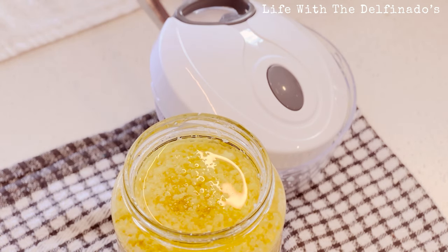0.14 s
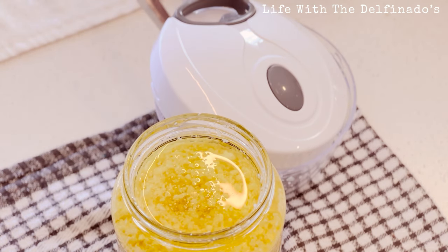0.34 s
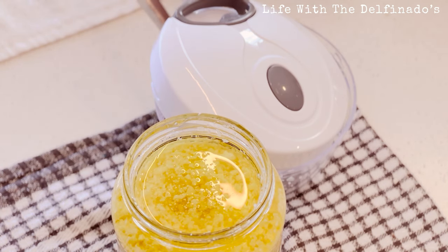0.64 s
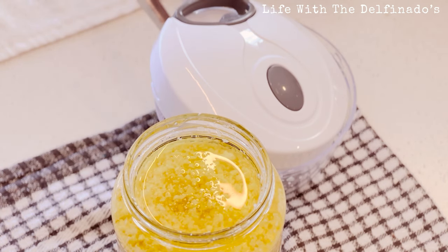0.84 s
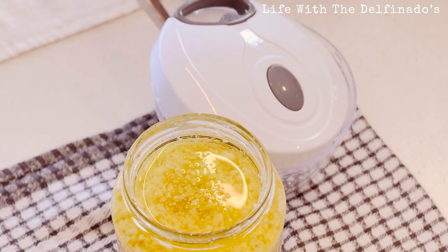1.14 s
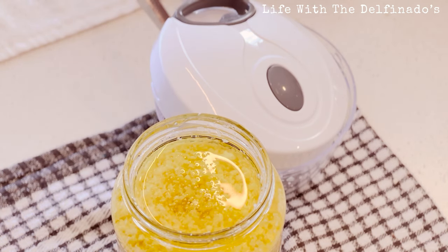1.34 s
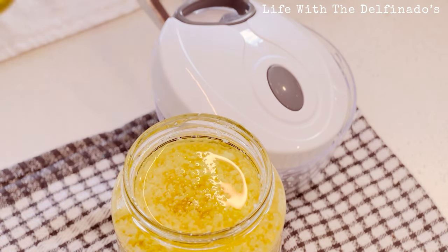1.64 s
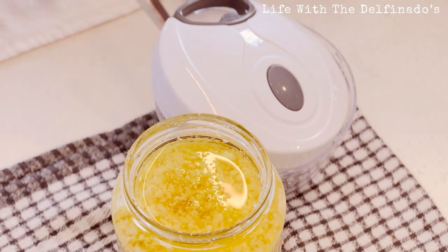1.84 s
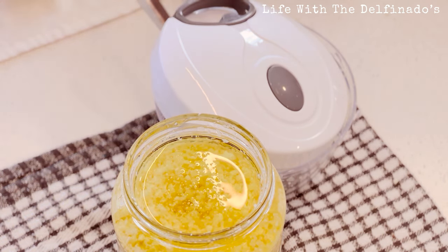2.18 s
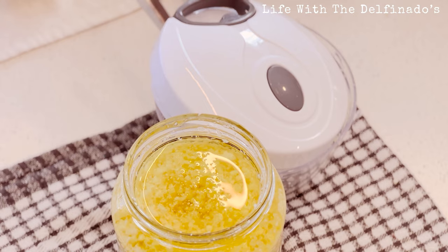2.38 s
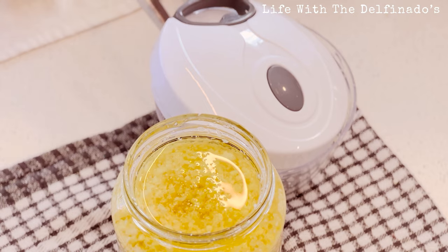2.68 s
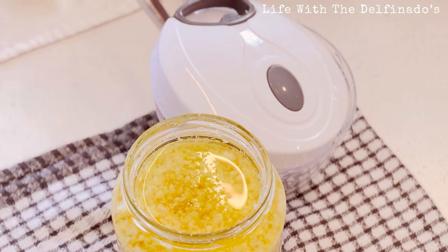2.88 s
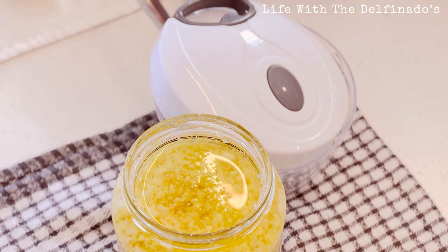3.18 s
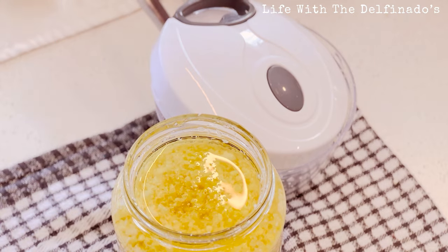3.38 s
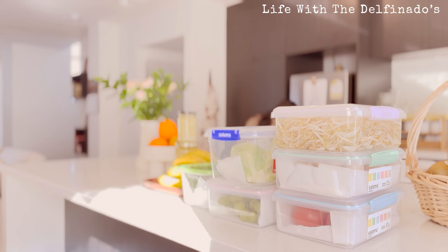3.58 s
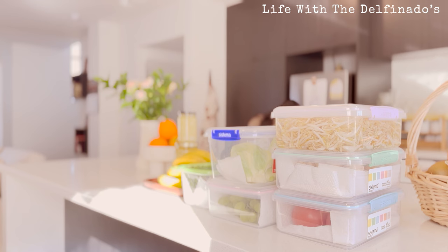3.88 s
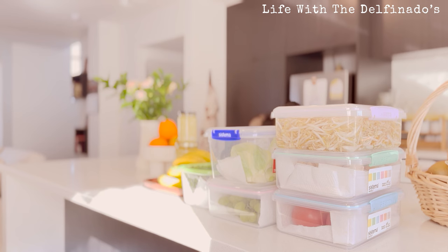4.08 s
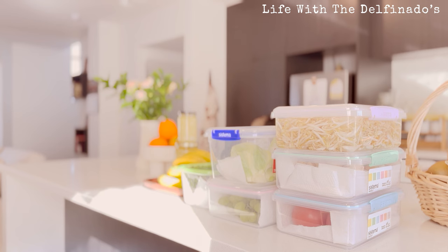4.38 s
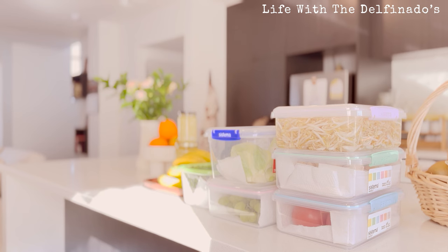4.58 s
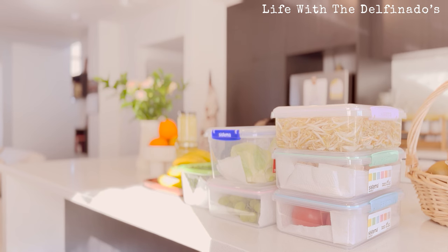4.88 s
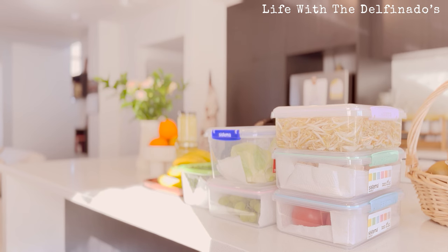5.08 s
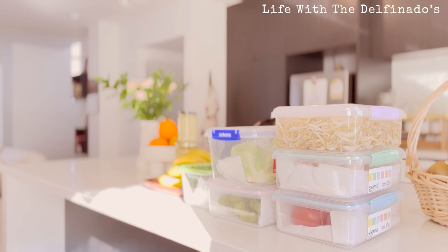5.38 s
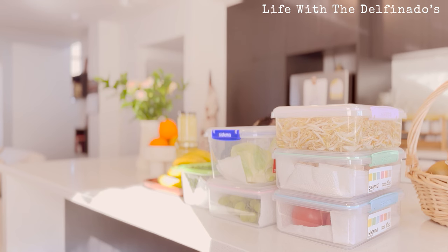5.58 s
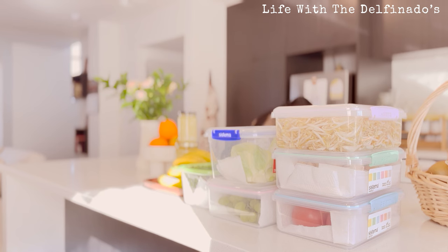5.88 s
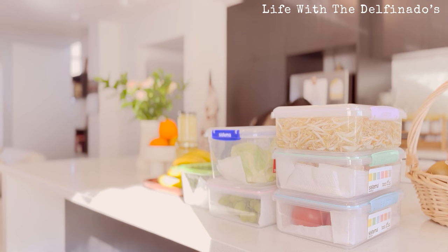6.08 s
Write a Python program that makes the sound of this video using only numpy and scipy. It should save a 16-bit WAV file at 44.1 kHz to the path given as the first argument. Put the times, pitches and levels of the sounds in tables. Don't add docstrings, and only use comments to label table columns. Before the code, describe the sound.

Soft cloth scuffs and tiny glass ticks close up over a low fridge hum, then paper crinkles and a plastic drawer bangs shut.

```python
import sys
import numpy as np
from scipy import signal
from scipy.fft import rfft, irfft
from scipy.io import wavfile
from scipy.ndimage import uniform_filter1d

SR = 44100
rng = np.random.default_rng(int(sys.argv[2]) if len(sys.argv) > 2 else 0)


def volts_from_db(level):
    exponent = np.asarray(level, float) / 20
    return 10 ** exponent


def transcribe(signal):
    frames = np.atleast_2d(signal).T
    limited = np.clip(frames, -1, 1)
    pcm = np.round(limited * 32767).astype(np.int16)
    wavfile.write(sys.argv[1], SR, pcm)


N = 274743
T = np.arange(N) / SR
HZ = np.fft.rfftfreq(N, 1 / SR)


def read(points, hz):
    f, value = np.transpose(points)
    return np.interp(np.log(hz + 1), np.log(f + 1), value)


def evened(x):
    return x / np.sqrt(np.mean(x ** 2) + 1e-20)


def bumps(peaks):
    return sum(db / (1 + (2 * (HZ - hz) / width) ** 2) for hz, width, db in peaks)


def add(mix, s, t60, rise, gain, hz=0, lead=0):
    t = T[:round(2 * t60 * SR)]
    part = mix[..., round(s * SR):][..., :len(t)]
    envelope = (1 - np.exp(-t / rise)) * volts_from_db(-60 * t / t60)
    shape = envelope * np.cos(2 * np.pi * hz * t + lead)
    part += gain * shape[..., :part.shape[-1]]


# f/Hz, likeness/0-1, left lead/rad, left-right level/dB
PORTS_1 = [(60, .99, 0, -1), (250, .8, 0, -.5), (700, .5, .2, 0), (1700, .4, .4, -4), (2700, .9, .6, 0),
           (7100, .85, 1.2, 0), (7450, .97, 3.1, 0), (7900, .85, 5.2, 0), (11100, .98, 3.1, 0),
           (14200, .99, 0, 0), (16000, .95, -.8, 0)]
PORTS_2 = [(60, .98, -.1, -2), (160, .93, -.3, -1), (330, .88, -.45, -1), (550, .2, -1, -1),
           (2000, .2, -.7, -1.5), (4500, .15, -.3, 1), (6900, .2, .8, 7), (8500, .6, -.3, 1),
           (11200, .98, -3.14, 0), (14000, .99, -6.1, 0), (15200, .99, -6.5, 0), (16000, .95, -7.3, 0)]


def pair(ports, grains=1.0):
    left, other = rfft(grains * rng.standard_normal((2, N)))
    hz, *columns = np.transpose(ports)
    same, lead, pan_db = (read(np.transpose([hz, column]), HZ) for column in columns)
    same = np.clip(same, 0, 1)
    right = (same * left + np.sqrt(1 - same ** 2) * other) * np.exp(-1j * lead)
    return np.array([left * volts_from_db(pan_db / 2), right / volts_from_db(pan_db / 2)])


# t/s, share/0-1
MOVE = [
    (3.0, 0.02),
    (3.4, 0.99),
]


def second_spot_share():
    return np.clip(np.interp(T, *np.transpose(MOVE)), 0, 1)


# f/Hz, level per Hz/dB
AIR_1 = [(20, -29.5), (55, -3.5), (100, -12), (259, -18), (428, -21.5), (800, -30), (1300, -42),
         (1930, -42), (3440, -53.5), (6000, -50), (8230, -49), (10000, -48), (12000, -48), (12600, -71.5)]
AIR_2 = [(20, -44), (55, -7), (100, -23), (130, -25.5), (240, -23), (330, -30), (500, -39.5), (1000, -51.5),
         (2000, -54.5), (4500, -61.5), (7400, -56.5), (9300, -68), (11800, -61), (12600, -90.5)]
# f/Hz, width/Hz, level/dB
AIR_BUMPS = [(7450, 150, -1.5), (5640, 120, -1), (8200, 150, 3.5)]


def still_air(share):
    first = pair(PORTS_1) * volts_from_db(read(AIR_1, HZ) + bumps(AIR_BUMPS))
    second = pair(PORTS_2) * volts_from_db(read(AIR_2, HZ))
    first, second = (evened(irfft(z, N)) for z in (first, second))
    first_part = volts_from_db(-48) * np.sqrt(1 - share) * first
    return first_part + volts_from_db(-43.5) * np.sqrt(share) * second


# t/s, level/dB
HUM = [(0, -42.5), (.19, -59.5), (.4, -38.5), (.59, -49), (1.0, -43.5), (1.22, -50.5), (1.39, -38),
       (1.53, -62), (1.68, -41), (2.19, -52.5), (2.34, -37), (2.51, -54.5), (2.67, -41.5), (2.85, -46.5),
       (3.68, -35.5), (5.38, -33.5), (6.23, -36.5)]
# multiple of its speed, level/dB
HUM_ORDERS = [(2, -19), (3, -19), (3.8, -28), (4.65, -30.5), (1.2, -16.5)]


def fridge(share):
    motor_hz, extra_blur_hz, blur_hz = 78.84, 1.396, 0.598
    wander = evened(irfft(rfft(rng.standard_normal(N)) * (HZ < 9), N))
    speed_hz = motor_hz + wander * (extra_blur_hz * (1 - share) + blur_hz)
    turn = 2 * np.pi * np.cumsum(speed_hz) / SR
    orders = sum(volts_from_db(db) * np.sin(k * turn + 6 * rng.random()) for k, db in HUM_ORDERS)
    level = volts_from_db(np.interp(T, *np.transpose(HUM)))
    lag = 0.13 * share * np.array([[1], [0]])
    pan = volts_from_db((0.6 + 1.0 * share) * np.array([[-1], [1]]))
    line = level * np.sin(turn - lag) * pan
    return np.sqrt(2) * (line + volts_from_db(-43.5 + 9.6 * share) * orders)


THUD_S = [2.028, 2.062]
# level/dB, t60/s
THUD = [
    (-23, 0.21),
    (-36, 1),
]
# f/Hz, level per Hz/dB
THUD_TONE = [(25, -19), (55, 5), (100, -1.5), (170, -10), (240, -31), (500, -32), (900, -79)]


def thud():
    level = np.zeros(N)
    for s, (db, t60) in zip(THUD_S, THUD):
        add(level, s, t60, .006, volts_from_db(db))
    return level * evened(irfft(pair(PORTS_1) * volts_from_db(read(THUD_TONE, HZ)), N))


def patchy(x, patch_db):
    def blotches(bins, frames):
        noise = rng.standard_normal(z.shape[1:])
        return evened(uniform_filter1d(uniform_filter1d(noise, size=bins, axis=0), size=frames, axis=1))

    z = signal.stft(x, nperseg=512)[2]
    patches = blotches(4, 12)
    crackle = blotches(14, 3)
    z = z * volts_from_db(patch_db * (patches + 0.57 * crackle))
    return evened(signal.istft(z, nperseg=512)[1][:, :N])


# lowest f/Hz, highest f/Hz
PARTS = [
    (90, 900),
    (900, 3800),
    (3800, 11800),
    (11800, 15900),
]
STEEP = np.array([[.8], [1], [1.3], [1.9]])


def part_slopes():
    slopes = []
    for lo, hi in PARTS:
        low_edge = 1 + (lo / (HZ + 1)) ** (3 + lo / 2500)
        high_edge = 1 + (HZ / hi) ** (3 + hi / 2500)
        slopes.append(1 / low_edge / high_edge)
    return np.array(slopes)[:, None]


def rubbed(strokes, law, extras, colour, blows, blow, tone, body, ports, slips_per_s, spread_db, patch_db):
    sizes = volts_from_db(spread_db * np.minimum(rng.exponential(1, N), 4))
    slips = sizes * (rng.random(N) < slips_per_s / SR)
    grains = 1.0 + evened(signal.lfilter([1], [1, -.985], slips))
    z = rfft(patchy(irfft(pair(ports, grains), N), patch_db))
    z = z * volts_from_db(read(tone, HZ) + bumps(body))

    rows = []
    for *timing_and_db, bright_db in strokes:
        boom_db = law[0] + law[1] * bright_db
        air_db = law[2] + law[3] * bright_db
        rows.append((*timing_and_db, boom_db, bright_db, air_db))
    rows += [(*row, *colour) for row in extras]

    level = np.zeros((4, N))
    for s, swell, fade, db, boom_db, crinkle_db, air_db in rows:
        span = slice(max(round((s - 3 * swell) * SR), 0), round((s + 3 * fade) * SR))
        away = np.maximum((s - T[span]) / swell, (T[span] - s) / fade)
        parts_db = np.array([[boom_db], [0], [crinkle_db], [air_db]])
        level[:, span] += volts_from_db(db - 4.5 + parts_db - 20 * STEEP * away ** 1.455)

    air_db, air_per_db, t60 = blow
    for s, db, boom_db, bright_db in blows:
        parts_db = np.array([[boom_db], [0], [bright_db], [air_db + air_per_db * bright_db]])
        add(level, s, t60, .0015, volts_from_db(db - 9.5 + parts_db))
    return sum(g * evened(part) for g, part in zip(level, irfft(z * part_slopes(), N)))


def ringing(times, touches_db, mode_sets, rise, ports):
    out = np.zeros((2, N))
    leads = np.array(ports)[:, ::2]
    for s, touch_db, modes in zip(times, touches_db, mode_sets):
        for hz, db, t60 in modes:
            lead = np.array([[read(leads, hz)], [0]])
            add(out, s, t60, rise + 0.25 / hz, volts_from_db(touch_db + db), hz, lead)
    return out


# peak t/s, swell/s, fade/s, scrape level/dB, brightness/dB (times to 20 dB under the peak)
CLOTH = [(0, .01, 0.0051, -47.5, -1.5), (.185, .03, 0.055, -63, 0), (.214, 0.029, 0.078, -54, -12),
         (.292, 0.068, 0.17, -41.5, -6.5), (.476, 0.14, 0.086, -45, -16), (.9, 0.065, 0.1, -54, -4.5),
         (.96, 0.056, 0.11, -54.5, 1.5), (1.13, 0.024, 0.21, -72.5, 8), (1.285, 0.067, 0.094, -54, 1.5),
         (1.35, 0.047, 0.11, -61.5, -12), (1.74, 0.18, 0.13, -55, -10), (1.84, 0.077, 0.095, -59, -19),
         (2.4, 0.016, 0.026, -58, -25), (2.43, 0.04, 0.081, -64, -27), (2.6, 0.027, 0.085, -68, -17),
         (2.7, .04, .05, -67, -16), (2.56, 0.044, 0.09, -70, 1), (2.77, 0.051, 0.38, -62, -15)]
CLOTH_LAW = (-44, -1, -23, 0.5)
# peak t/s, swell/s, fade/s, scrape level/dB
FLICKS = [(.08, .04, .04, -82), (.138, .06, .06, -78), (.385, .04, .05, -84), (.88, .06, .06, -82),
          (1.05, .03, .03, -84), (1.2, .03, .03, -83), (.46, .06, .06, -80), (.608, .04, .04, -71),
          (.29, .05, .06, -80), (.79, .04, .04, -84), (.95, .12, .09, -80), (1.25, .04, .05, -84),
          (1.39, .03, .03, -82), (1.136, .09, .07, -71), (1.438, .06, .05, -75)]
# boom/dB, crinkle/dB, air/dB
FLICK = (-30, 8, 21)
# t/s, scrape level/dB, boom over scrape/dB, brightness/dB
TICKS = [(.2458, -49, -18, -25), (0.51, -40, -6, -36), (.8934, -41, -16, -24), (1.2605, -63, -17, -14),
         (1.428, -60.5, -16, 9), (1.6213, -52, 11, -18), (2.142, -68, 3, -22), (2.751, -44.5, -2, -1.5),
         (2.8444, -61, -7, -18)]
# air level/dB, air per dB of brightness, t60/s
TICK = (-7, 3.3, 0.066)
# f/Hz, level per Hz/dB
CLOTH_TONE = [(300, -25), (634, 3), (1230, -11), (1700, 1.5), (2500, 0), (3300, -10.5), (4000, -12),
              (6000, -11), (7440, -21.5), (10000, -27.5), (12000, -41), (14000, -36), (16000, -38)]
# f/Hz, width/Hz, level/dB
CLOTH_BODY = [(2160, 500, 1.3), (2700, 88, 1.6), (5500, 500, 1.6), (6260, 200, 3.7), (6830, 280, 4.9),
              (7860, 200, 7.2), (9150, 75, 2.8), (9800, 270, 4)]


def cloth():
    return rubbed(CLOTH, CLOTH_LAW, FLICKS, FLICK, TICKS, TICK, CLOTH_TONE, CLOTH_BODY, PORTS_1,
                  slips_per_s=900, spread_db=0.72, patch_db=2.4)


CLINK_S = [1.4297, 1.618, 2.5537, .513, .894, 2.388, 2.7497, .6846, 2.562, 2.396, 2.42, 2.445, 2.144]
CLINKS = [-47.5, -52, -56, -40, -49, -49.5, -44, -49.5, -61, -60, -58, -60, -65]
# f/Hz, level/dB, t60/s
GLASS = [
    [(2920, -5.5, .03), (4100, -2, .02), (6900, -3, .03), (7770, -3, .09), (9800, 0, .04),
     (13700, 12, 0.018), (15000, 2, .03)],
    [(2180, 6.5, 0.047), (4390, -10, 0.055), (5640, -9, .03)],
    [(2190, -2, 0.2), (2630, -6, 0.1), (3070, -7, 0.15), (3600, -8, .17), (4320, -9.5, 0.15),
     (5030, -12, .15), (6050, -4, .1), (6240, 10.5, 0.071), (6830, -5, .06)],
    [(2030, 3, 0.022), (2630, -23, .02)],
    [(2150, 1, 0.19), (2730, 3, 0.13), (9000, -7, .08)],
    [(1400, -0.5, 0.044), (1690, 7.5, 0.023), (2040, 1, 0.044), (2800, -19, 0.018)],
    [(595, 6.5, 0.018), (1260, 2, 0.01), (2110, 2.5, 0.012), (4500, -0.5, 0.013), (5750, -5, 0.0098),
     (9000, 5, 0.0073)],
    [(5840, 0, 0.0071), (6960, 0, 0.0098), (9200, 0, 0.0072)],
    [(2210, 2, .4), (1950, -3, .2), (2600, -4, 0.3), (6810, -4, .06), (6050, -8, .15)],
    [(1610, 1, .12), (2230, -3, .12), (1900, -1, .1), (3000, -8, .02)],
    [(1740, 2, 0.083), (2300, -5, .06)],
    [(1660, -2, .08), (1500, -1, 0.13)],
    [(1300, 1, .02), (700, 1, .02)],
]


def glass_jar():
    return ringing(CLINK_S, CLINKS, GLASS, 0.00027, PORTS_1)


# peak t/s, swell/s, fade/s, scrape level/dB, brightness/dB
PAPER = [(3.09, 0.17, 0.087, -53.5, -4.5), (3.142, 0.05, 0.15, -48, 8), (3.26, 0.045, 0.083, -42, -1.5),
         (3.384, 0.19, 0.4, -38, 5), (3.61, 0.31, 0.25, -35, -2), (4.0, 0.022, 0.085, -50.5, -1.5),
         (5.465, 0.025, 0.055, -70, 10), (5.766, 0.12, 0.5, -75, -16), (6.0, 0.055, 0.1, -60, -12),
         (6.09, 0.032, 0.13, -51, -12.5)]
PAPER_LAW = (-7, 0.82, -5.5, 1.5)
# peak t/s, swell/s, fade/s, scrape level/dB
SHOVES = [(3.1, 0.035, 0.11, -59), (3.613, 0.0051, 0.066, -46), (3.68, .03, 0.1, -54.5),
          (3.72, 0.031, 0.18, -60), (3.85, 0.07, 0.11, -64.5), (3.47, 0.13, 0.065, -63),
          (5.77, 0.066, 0.72, -73)]
# boom/dB, crinkle/dB, air/dB
SHOVE = (21, -15, -40)
# t/s, scrape level/dB, boom over scrape/dB, brightness/dB
SNAPS = [(3.042, -60, -5, -3), (3.068, -73, 0, -8), (3.13, -53, -9, 8), (3.1395, -49, -6, 9),
         (3.239, -36.5, 1, -2), (3.3704, -36.5, -21, 13), (3.4524, -23.5, -13, -3.5),
         (3.5557, -39, -36, 13), (3.763, -28, -32, -7.5), (5.975, -52, 2, -8), (6.068, -41, 5, -11),
         (3.93, -61.5, -13, 0)]
# air level/dB, air per dB of brightness, t60/s
SNAP = (-11.5, 1.4, 0.13)
# f/Hz, level per Hz/dB
PAPER_TONE = [(60, -36), (100, -0.5), (244, -7.5), (500, -3.5), (1000, -4), (1720, -8.5), (3000, -10.5),
              (5000, -15), (7000, -15.5), (9500, -17.5), (12000, -19), (14500, -17), (16000, -15.5)]
# f/Hz, width/Hz, level/dB
PAPER_BODY = [(408, 63, 6.3), (2250, 140, 3.9), (7800, 2900, 3.4)]


def paper():
    return rubbed(PAPER, PAPER_LAW, SHOVES, SHOVE, SNAPS, SNAP, PAPER_TONE, PAPER_BODY, PORTS_2,
                  slips_per_s=1500, spread_db=3.0, patch_db=2.12)


# peak t/s, swell/s, fade/s, scrape level/dB, brightness/dB
DRAWER = [(3.994, 0.019, 0.1, -74, 11.5), (4.116, 0.038, 0.13, -27, -4.5), (4.21, 0.056, 0.09, -39.5, -2.5),
          (4.3, 0.037, 0.18, -42.5, -10), (4.39, 0.023, 0.13, -37, -20.5), (4.51, 0.28, 0.16, -38.5, -13.5),
          (4.578, 0.018, 0.082, -26, -12), (4.606, 0.044, 0.21, -28.5, -19.5), (4.73, .1, 0.062, -56, -41)]
DRAWER_LAW = (-1.5, 0, 1.5, 2)
# peak t/s, swell/s, fade/s, scrape level/dB
ROLLS = [
    (4.089, 0.043, 0.12, -41),
    (4.485, 0.23, 0.13, -44),
    (4.609, 0.043, 0.073, -44),
]
# boom/dB, crinkle/dB, air/dB
ROLL = (20, -8, -30)
# t/s, scrape level/dB, boom over scrape/dB, brightness/dB
KNOCKS = [(4.022, -45.5, -10.5, 16), (4.0531, -23, 4.5, -3), (4.103, -29, -18, -11),
          (4.114, -23.5, -2, -4.5), (4.201, -26, -12, -10.5), (4.28, -34, -8, 2), (4.385, -20.5, -7, -40),
          (4.411, -23, -3, -41), (4.4525, -30, 2.5, -32), (4.481, -22.5, 9, -17), (4.568, -11, -8.5, -25.5),
          (4.586, -19.5, 8.5, -18), (4.604, -24, 12, -52), (4.626, -34, 3, -32), (4.662, -26.5, 3.5, -31.5),
          (4.686, -30, -6, -27)]
# air level/dB, air per dB of brightness, t60/s
KNOCK = (-17.5, 0.45, 0.1)
# f/Hz, level per Hz/dB
DRAWER_TONE = [(53, -34), (95, -7), (133, -1), (192, -2), (272, -1.5), (385, 0), (804, -5.5), (1100, -5),
               (1440, -6), (1900, -14.5), (2400, -17), (3000, -22.5), (4360, -33), (8350, -40),
               (11100, -61), (16000, -60)]
# f/Hz, width/Hz, level/dB
DRAWER_BODY = [(106, 12, 2), (181, 7.4, 4.1), (399.4, 19, 6.4), (780, 65, 1.1), (1680, 16, 1.2),
               (2920, 1100, 2.6)]


def drawer():
    return rubbed(DRAWER, DRAWER_LAW, ROLLS, ROLL, KNOCKS, KNOCK, DRAWER_TONE, DRAWER_BODY, PORTS_2,
                  slips_per_s=700, spread_db=0.89, patch_db=1.9)


BANG_S = [4.054, 4.108, 4.382, 4.455, 4.575, 3.612, 4.5977, 4.203, 3.66, 4.07, 4.111, 4.398, 4.473, 4.624,
          4.6556, 3.624, 3.608, 4.6819, 3.369, 3.525, 2.029, 2.06, 4.445, 4.745]
BANGS = [-26, -26.5, -24.5, -27, -14.5, -35.5, -22, -25, -30, -20, -20, -23, -23.5, -16.5, -18.5, -29, -32,
         -27, -38, -40, -26.5, -25.5, -28.5, -32.5]
# f/Hz, level/dB, t60/s
PANELS = [
    [(109, -16, 0.1), (242, -0.5, .2), (440.6, 3, 0.3), (557, -3, 0.17)],
    [(715, -6, 0.49), (868, -9.5, 0.19), (1364, -2.5, 0.27), (2950, -8, 0.23)],
    [(378, -1.5, 0.34), (705, -3.5, 0.3), (830, -6, 0.25), (1345, -2, 0.14), (1483, -5.5, 0.24)],
    [(390, 7.5, 0.17), (738, -2, 0.3), (2853, -7, 0.21)],
    [(107, -6, 0.2), (190.4, -18, 0.13), (394, -13, 0.15), (1020, -15, 0.33), (1440, -19, 0.25),
     (1697, -12, 0.4), (1911, -7.5, .25), (2436, -18.5, .3), (3030, -36, .3), (4720, -22.5, 0.18)],
    [(255, 12.5, 0.18), (700, -5, 0.15), (537, -16, 0.11), (1040, -13, 0.11)],
    [(104, 9, 0.35), (193, 6, 0.21), (394, -6, 0.27), (489, -16, 0.21)],
    [(648.5, 1.5, 0.21), (984, -4, 0.16), (1410, -2, 0.12), (1600, -12, 0.12)],
    [(727, 5, 0.2), (1140, -8, .15)],
]
# f/Hz, level/dB, t60/s
LATER_RINGS = [
    [(89.7, 9.5, .09), (245, -4, .2), (432, -6, .2)],
    [(97, 6.5, .1), (440, -4.5, 0.09), (1458, -2.5, .12)],
    [(392, 2, .2), (747, -5, 0.13), (1253, -7, .1)],
    [(390, -0.5, 0.18), (290, 0.5, 0.091), (705, -3.5, 0.24), (814, 1.5, .25)],
    [(195.3, 6.5, 0.18), (100, -13, .15), (358, -1, 0.17)],
    [(189.5, 3, 0.21), (104, -6, 0.13), (361, -4.5, .12), (603, -20, 0.22)],
    [(88.6, 3, .2), (516, 4.5, .15), (675, 0, .18)],
    [(417, 7, 0.11), (790, -8, .12), (1115, 0, 0.072)],
    [(190, -3, 0.23), (450, -6, .3), (721, -14, 0.45), (1035, -9, .4)],
    [(2200, 1, 0.064)],
    [(1100, 9, .06)],
    [(149, 3, 0.17), (94, 3, 0.17)],
    [(65.6, 6, 0.25), (110, -12, .1)],
    [(189.3, 1, .3), (149, -3, .3)],
    [(182, 1.5, 0.17), (448, -6, 0.18), (588, -8, .15)],
]


def drawer_panels():
    return ringing(BANG_S, BANGS, PANELS + LATER_RINGS, 0.0017, PORTS_2)


# f/Hz, t60/s
ROOM = [(100, 0.43), (300, 0.6), (1000, 0.44), (3000, 0.48), (7000, 0.35), (12000, 0.19)]


def room(x):
    hz, t, z = signal.stft(irfft(pair(PORTS_2), N)[:, :SR], SR, nperseg=256)
    decay_db = -60 * t / read(ROOM, hz)[:, None]
    bass_db = -8.5 * (hz[:, None] < 400)
    tail = signal.istft(z * volts_from_db(decay_db + bass_db), SR, nperseg=256)[1]
    tail *= 1 - np.exp(-(np.arange(tail.shape[1]) / SR / 0.0026) ** 2)
    return signal.fftconvolve(x[:1], tail / np.linalg.norm(tail[0]), axes=1)[:, :N]


def scene():
    share = second_spot_share()
    near = cloth() + glass_jar()
    sheet = paper()
    far = drawer() + drawer_panels()
    wet = room(volts_from_db(-11.0) * near + volts_from_db(-7.0) * sheet + volts_from_db(-6.5) * far)
    background = thud() + fridge(share) + still_air(share)
    return near + sheet + volts_from_db(-4.0) * far + wet + background


def top_cut(x):
    return signal.sosfilt(signal.butter(12, 16400, fs=SR, output="sos"), x)


# f/Hz, threshold/dB
GATE_MID = [(2000, -128), (8800, -124), (9700, -111), (10500, -106), (11500, -101), (12500, -84),
            (14500, -103), (16000, -91.5)]
GATE_SIDE = [(2000, -112), (5000, -106), (8500, -104), (11000, -108), (11600, -98.5), (12500, -99.5),
             (14500, -90), (16000, -99)]


def record(dry):
    mid_side = np.array([dry[0] + dry[1], dry[0] - dry[1]]) / 2
    hz, _, z = signal.stft(mid_side, SR, nperseg=2048, noverlap=1024, boundary="odd")
    power = abs(z[:, :1024]).reshape(2, 64, 16, -1) ** 2
    bands = np.repeat(np.mean(power, axis=2), 16, axis=1)
    flicker = uniform_filter1d(11.0 * rng.standard_normal((2, 32, z.shape[2])), size=3)
    fickle_db = np.repeat(flicker, 32, axis=1)
    gate_db = np.array([read(GATE_MID, hz), read(GATE_SIDE, hz)])[:, :1024, None] + fickle_db
    masked_db = 10 * np.log10(bands[::-1] + 1e-20) - 9.0 - 40 * (hz[:1024, None] < 9800)
    gate_db = np.maximum(gate_db, masked_db)
    z[:, :1024] *= bands > volts_from_db(2 * gate_db)
    z[:, hz > 15900] = 0
    mid, side = signal.istft(z, SR, nperseg=2048, noverlap=1024)[1][:, :N]
    return top_cut(np.array([mid + side, mid - side]))


dry = scene()
out = record(dry)
transcribe(out)
```